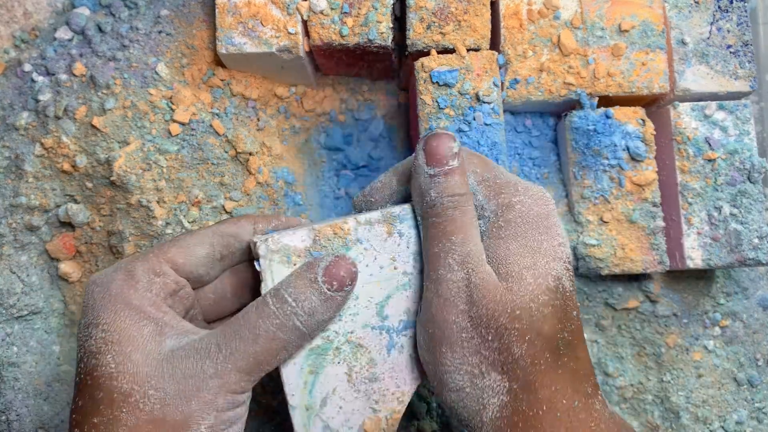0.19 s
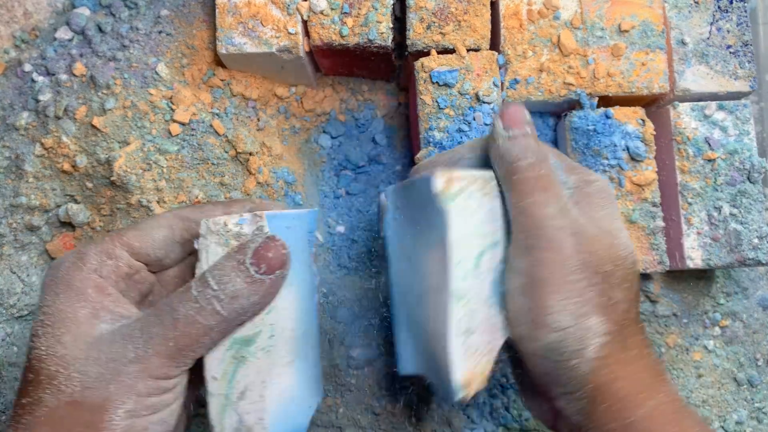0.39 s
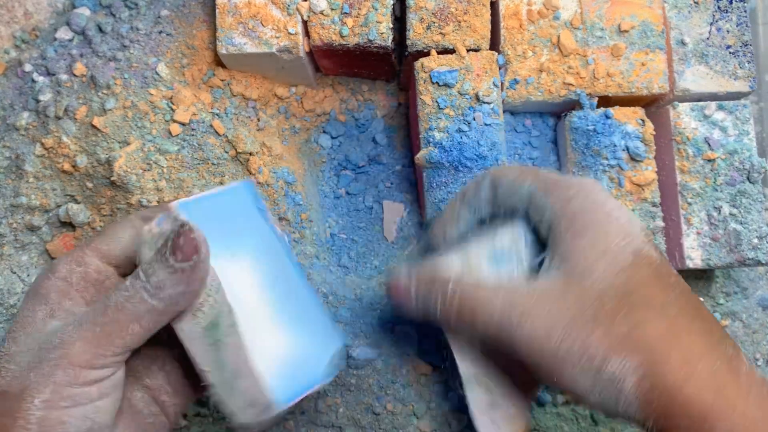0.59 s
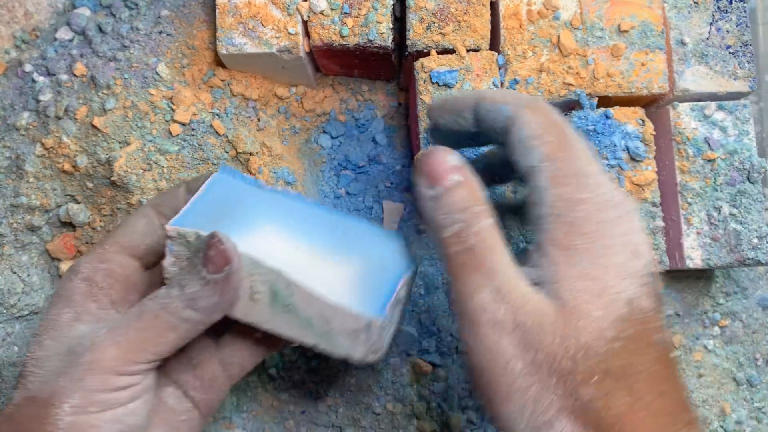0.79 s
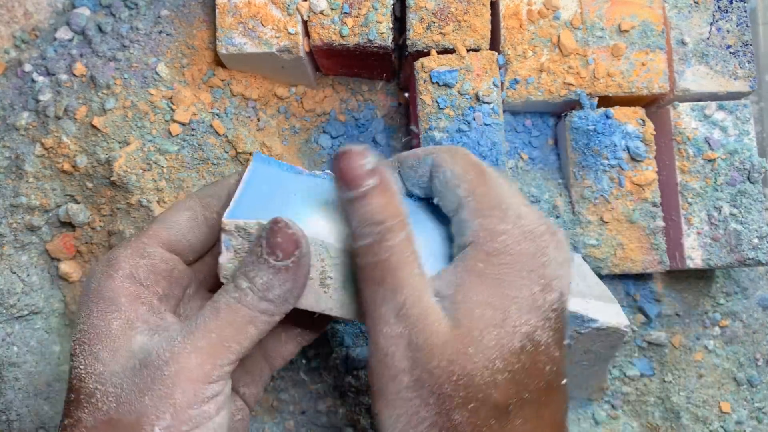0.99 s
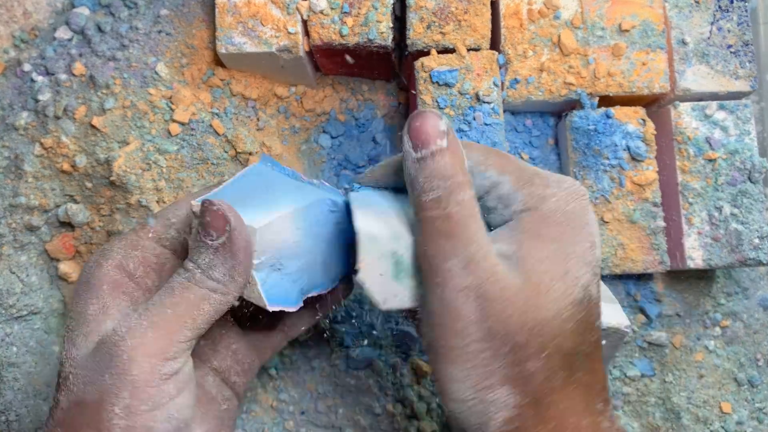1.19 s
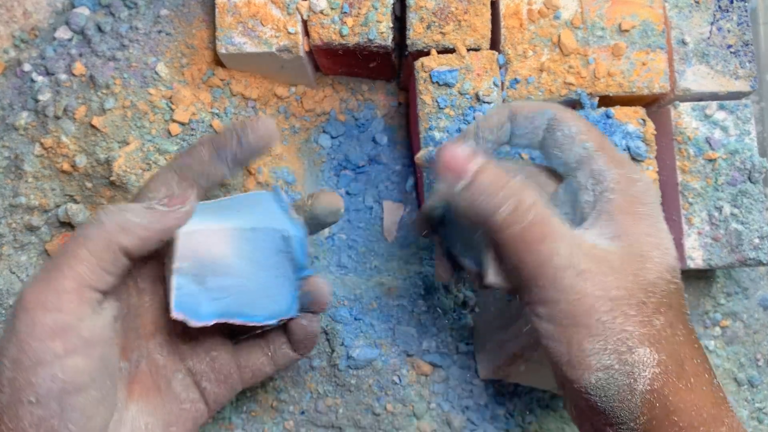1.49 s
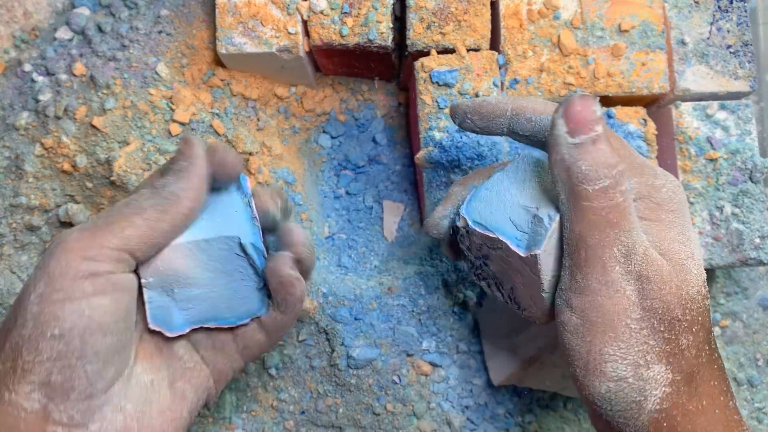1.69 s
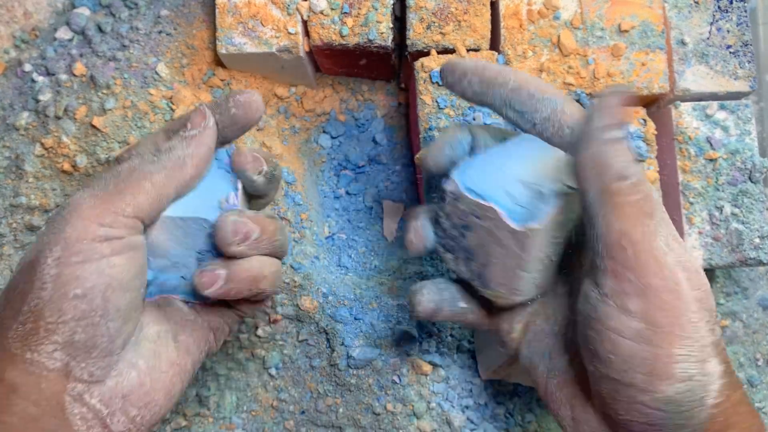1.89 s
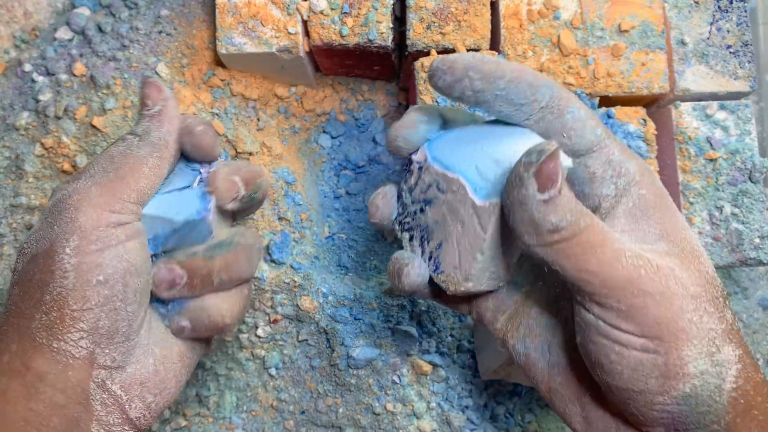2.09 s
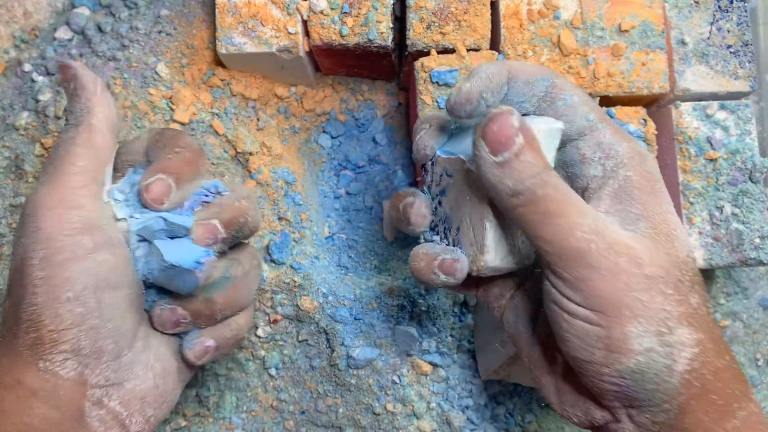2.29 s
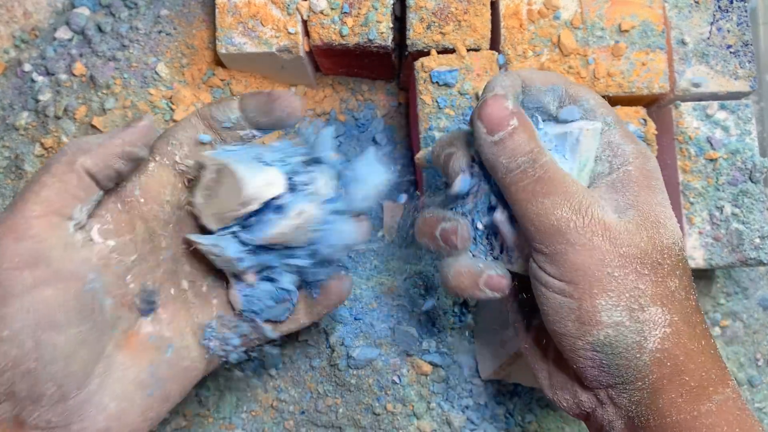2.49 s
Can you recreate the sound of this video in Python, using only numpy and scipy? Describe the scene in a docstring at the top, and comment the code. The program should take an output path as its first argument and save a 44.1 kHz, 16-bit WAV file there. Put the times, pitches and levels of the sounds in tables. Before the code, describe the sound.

Chalk breaks twice with a crisp crack and hollow thump, with faint gritty sliding between the breaks. Softer crunches follow as a fist crushes a piece, close to a stereo microphone in a small, quietly humming room.

```python
"""Over a low room hum, a block of gym chalk snaps in two hands. The pieces slide over each other,
snap again, and one is crushed in the fist. Each break is a burst of tiny fractures with a hollow
thump; rubbing is a stream of fine grit that makes a loose piece ring; crushing is a run of small
collapses over grinding powder. A close stereo microphone hears it in a small room."""
import sys
import numpy as np
from scipy import signal
from scipy.fft import rfft, irfft
from scipy.io import wavfile

SR = 44100
rng = np.random.default_rng(int(sys.argv[2]) if len(sys.argv) > 2 else 0)


def log_audio(samples):
    """Write samples as a 16-bit WAV file to the path given in sys.argv[1]."""
    # one column per channel
    frames = np.atleast_2d(samples).T
    # limit to full scale, then quantise
    limited = np.clip(frames, -1, 1)
    pcm = np.round(limited * 32767).astype(np.int16)
    wavfile.write(sys.argv[1], SR, pcm)


N = 116865
TIME = np.arange(N) / SR
LEFT_RIGHT = np.array([[1], [-1]])


def undb(db):
    """Decibels to gain."""
    return 10 ** (np.asarray(db) / 20)


def rms(x):
    """Root mean square, never zero."""
    return np.sqrt(np.mean(x ** 2) + 1e-30)


def unit(x):
    """Scale to rms 1."""
    return x / rms(x)


def fader(curve):
    """Gain along (t/s, level/dB) points."""
    return undb(np.interp(TIME, *np.array(curve).T))


def through(x, ir):
    """Both channels through one impulse response."""
    return signal.fftconvolve(x, ir[None], axes=1)[:, :x.shape[1]]


def add(out, x, at):
    """Mix x in, centred on the given time."""
    start = int(round(at * SR)) - x.shape[1] // 2
    lo, hi = max(start, 0), min(start + x.shape[1], N)
    out[:, lo:hi] += x[:, lo - start:hi - start]


def colour(x, spectrum, tilt_db_oct=0):
    """Unit-power filter through (f/Hz, level/dB) points, falling 14 dB/oct below them, then tilted."""
    size = 2048
    hz, db = np.array(spectrum).T
    octave = np.log2(np.maximum(np.fft.rfftfreq(size, 1 / SR), 10))
    below = np.maximum(np.log2(hz[0]) - octave, 0)
    shape_db = np.interp(octave, np.log2(hz), db) - 14 * below + tilt_db_oct * octave
    cepstrum = irfft(np.log(undb(shape_db - shape_db.max()) + 1e-5))
    cepstrum[1:size // 2] *= 2  # fold to minimum phase
    cepstrum[size // 2 + 1:] = 0
    ir = irfft(np.exp(rfft(cepstrum)))
    return through(x, ir / np.linalg.norm(ir))


def diffuse(spectrum, wide_hz=480):
    """Stereo noise through (f/Hz, level/dB) points, centred in the bass and wide above."""
    f = np.maximum(np.fft.rfftfreq(N, 1 / SR), 1)
    hz, db = np.array(spectrum).T
    mid, side = rfft(rng.standard_normal((2, N))) * undb(np.interp(np.log(f), np.log(hz), db))
    return unit(irfft(mid + LEFT_RIGHT * side * f / np.hypot(f, wide_hz), N))


def grains(size, per_s, spread_db, side_power=0.275):
    """Tiny fractures of random time and size, each leaning left or right; rms 1."""
    hit = rng.random(size) < per_s / SR
    strength = undb(spread_db * np.clip(rng.standard_normal(size), -2.5, 2.5))
    polarity, side = rng.choice([-1, 1], (2, size))
    lean = np.sqrt(1 - side_power) + np.sqrt(side_power) * LEFT_RIGHT * side
    return unit(hit * polarity * lean * strength)


def burst(spectrum, rise_s, decay_s, tilt_db_oct=0):
    """Fractures that build up and die away, peaking in the middle of the array."""
    t = np.arange(-4096, 4096) / SR
    envelope = np.exp(np.minimum(t / rise_s, -t / decay_s))
    fractures = envelope * grains(len(t), per_s=5500, spread_db=5)
    return unit(colour(fractures, spectrum, tilt_db_oct)) * rms(envelope)


# spectrum of the low room hum: f/Hz, level/dB
HUM_SPECTRUM = [(10, -55), (24, -28), (36, -4), (55, 5), (75, -0.5), (86, -1), (105, -0.5), (120, -1.5),
                (138, 8.5), (152, -3.5), (175, -14.5), (240, -21), (310, -10.5), (370, -18.5), (450, -16),
                (600, -29.5), (740, -33), (2000, -46), (6000, -47.5), (15000, -53.5)]
# spectrum of a hollow rush that swells after each break: f/Hz, level/dB
RUSH_SPECTRUM = [(10, -48), (150, -36.5), (300, -3), (420, 4), (570, 1.5), (700, -19), (1500, -28),
                 (5000, -69)]
# rush envelope: t/s, level/dB
RUSH_LEVEL = [(0, -60.5), (.2, -55.5), (.32, -52.5), (.5, -58), (.8, -68.5), (1.08, -79.5), (1.2, -62.5),
              (1.6, -70), (2.3, -73), (2.47, -57), (2.65, -62)]


def background(hum_db=-50, waver_db=0.5):
    """A slightly wavering low hum and a soft hollow rush that swells after each break."""
    waver = np.interp(TIME, np.arange(32) / 10, rng.standard_normal(32))
    hum = undb(hum_db + waver_db * waver) * diffuse(HUM_SPECTRUM)
    return hum + fader(RUSH_LEVEL) * diffuse(RUSH_SPECTRUM)


# powder envelope: t/s, level/dB
POWDER_LEVEL = [(0, -72.5), (.1, -93), (.42, -77), (.62, -74), (.69, -59), (.77, -88), (.88, -99),
                (.96, -70), (1.08, -66), (1.14, -57.5), (1.22, -68.5), (1.46, -71), (1.7, -66.5),
                (1.88, -63.5), (2.02, -57), (2.07, -62.5), (2.2, -59), (2.3, -66), (2.39, -60),
                (2.46, -64.5), (2.535, -69), (2.65, -57.5)]
# powder spectrum: f/Hz, level/dB
POWDER_SPECTRUM = [(350, -32), (600, -12.5), (809, -16), (1060, 1.5), (1230, -6), (2160, -1), (3160, -9.5),
                   (4310, 0.5), (4810, -14.5), (6760, -3.5), (8990, -13), (9760, -25), (10900, -5),
                   (12800, -17.5), (15500, -32)]


def powder():
    """Powder grinds and trickles between the fingers."""
    return fader(POWDER_LEVEL) * colour(grains(N, per_s=3000, spread_db=5), POWDER_SPECTRUM)


# finger strokes: t/s, length/s, level/dB, tilt/(dB/oct)
STROKES = [(0.082, 0.013, -71, -3), (0.394, 0.046, -69, 0.5), (0.48, .03, -62.5, 9), (.51, 0.18, -64, 2),
           (0.731, 0.013, -56.5, -1), (0.884, 0.014, -69.5, 3), (.928, 0.019, -56, 1), (.95, 0.051, -57, 0),
           (1.02, 0.03, -64, 4.5), (1.126, .05, -63, 3), (1.249, .018, -61, -2), (1.284, 0.014, -63, 6),
           (1.352, .022, -55.5, -1), (1.417, 0.013, -66, -2), (1.499, 0.029, -59, 0),
           (1.544, 0.024, -59, 2.5), (1.615, 0.017, -52, 4.5), (1.706, 0.046, -58.5, -0.5),
           (1.773, 0.037, -56, 3)]
# friction spectra: f/Hz, level/dB
GRIT_SPECTRUM = [(700, -24), (1400, -15), (2200, -12), (3000, -20.5), (4000, -4), (5000, -1), (6300, 0.5),
                 (7500, -5.5), (9000, -7.5), (11000, -7), (13000, -7.5), (14200, -12), (15500, -47)]
SCUFF_SPECTRUM = [(3500, -19), (5500, -19), (6150, 7), (6700, -14), (9000, -31), (12500, -12),
                  (15000, -36)]
GRIT_PER_S, GRIT_SPREAD_DB = 9900, 4


def rubs(attack_s=0.0069, release_s=0.0071, catch_db=3.5, catch_s=0.0062):
    """Skin catches and slips on the chalk, shedding fine grit; a piece scuffs once, high and narrow."""
    out, size = np.zeros((2, N)), 16384
    t = (np.arange(size) - size // 2) / SR
    for at, length, db, tilt in STROKES:
        edges = np.minimum((t + length / 2) / attack_s, (length / 2 - t) / release_s)
        envelope = np.exp(np.minimum(0, edges))
        catch = np.interp(t - t[0], catch_s * np.arange(128), rng.standard_normal(128))
        grit = colour(grains(size, GRIT_PER_S, GRIT_SPREAD_DB), GRIT_SPECTRUM, tilt)
        add(out, undb(db + catch_db * catch) * envelope * grit, at + length / 2)
    add(out, undb(-45.5) * burst(SCUFF_SPECTRUM, rise_s=0.0046, decay_s=0.014), at=0.932)
    return out


# modes of a loose piece: f/Hz, level/dB, t60/s
PIECE_MODES = [(2234, -11.5, 0.17), (4110, 4, 0.031), (4390, 9.5, 0.015), (5340, 0, 0.013),
               (6220, 7, 0.0087), (7630, 0.5, 0.014)]
# sliding drive: t/s, level/dB
SLIDE_LEVEL = [(.46, -71), (.482, -55.5), (.55, -67), (.62, -62.5), (.644, -50), (.67, -62.5), (.71, -78),
               (.75, -75)]


def loose_piece(clink_db=-26.5, tick_db=-35.5):
    """One piece scrapes along the other and clinks against its edge; both ring the same modes."""
    t = TIME[:SR // 3]
    ring = sum(undb(db - 60 * t / t60) * np.sin(2 * np.pi * hz * t) for hz, db, t60 in PIECE_MODES)
    tick = np.zeros((2, N))
    add(tick, burst(GRIT_SPECTRUM, rise_s=0.00042, decay_s=0.0013), at=0.6515)
    clink = unit(through(tick, ring)) * rms(tick)
    touching = (TIME > SLIDE_LEVEL[0][0]) & (TIME < SLIDE_LEVEL[-1][0])
    friction = touching * fader(SLIDE_LEVEL) * grains(N, GRIT_PER_S, GRIT_SPREAD_DB)
    scrape = through(friction, ring / np.linalg.norm(ring))
    return scrape + undb(clink_db) * clink + undb(tick_db) * tick


# small collapses: t/s, grit/dB, fragments/dB, thud/dB, rise/s, decay/s
COLLAPSES = [(0.181, -46, -84, -82, 0.00049, .0015), (.231, -66, -52, -72, 0.0015, 0.0033),
             (.853, -66, -88, -85, .002, .003), (0.2522, -44, -56, -34.5, 0.0015, 0.0077),
             (1.1, -55, -51, -55, 0.0019, .001), (1.110, -52, -56.5, -46, 0.0007, 0.0029),
             (1.772, -60, -50, -56, 0.0014, 0.0077), (1.846, -51.5, -52, -57, 0.00027, .002),
             (1.879, -42, -50.5, -64, 0.0004, 0.0013), (1.918, -42.5, -54.5, -49, 0.0029, 0.001),
             (1.93, -47, -65, -67, 0.00038, 0.0011), (1.943, -36, -27.5, -35, 0.0013, 0.0012),
             (2.001, -47, -46.5, -68, 0.0012, 0.0026), (2.006, -44.5, -42.5, -53, 0.00061, 0.0048),
             (2.058, -46.5, -51, -65, 0.00066, 0.0015), (2.094, -36.5, -48, -45.5, 0.00017, 0.006),
             (2.124, -42, -37, -50, 0.00062, 0.00068), (2.132, -37, -29, -39.5, 0.00023, 0.00086),
             (2.186, -41, -47.5, -65, 0.00029, 0.0039), (2.283, -45.5, -68, -70, .0005, 0.00072),
             (2.2968, -37, -43.5, -58, 0.00071, 0.0014), (2.320, -42, -64, -69, 0.00042, 0.0011),
             (2.328, -39.5, -60, -62, 0.00045, 0.0016), (2.334, -46.5, -54, -55, 0.0018, 0.007),
             (2.3538, -35.5, -42, -41, 0.002, 0.004), (2.359, -49, -56, -52, 0.00078, 0.02),
             (2.381, -41, -53, -46, 0.0048, 0.0037), (2.411, -47, -60, -62, .001, 0.0014),
             (2.434, -54, -54, -66, 0.00044, 0.0038), (2.551, -50, -54, -82, .002, 0.0059),
             (2.568, -60, -45.5, -46.5, 0.00055, 0.0025), (2.595, -63, -52, -54.5, 0.0015, .003),
             (2.632, -69, -34.5, -43, 0.0019, 0.0013)]
# spectra of fine grit, coarse fragments, cupped hand and cave-in: f/Hz, level/dB
FINE_SPECTRUM = [(900, -12), (2000, -5), (3000, -7.5), (4000, 0.5), (5000, -0.5), (6600, 4), (9000, -6),
                 (11000, -4.5), (13300, -0.5), (15500, -25.5)]
COARSE_SPECTRUM = [(600, -18), (1000, -9.5), (1350, -8.5), (1750, -2.5), (2200, -2), (2600, -2.5),
                   (3100, -13), (4300, -7), (5200, -12.5), (9000, -33), (15000, -41)]
THUD_SPECTRUM = [(100, -21), (220, -12), (320, 6), (500, -6), (800, -10), (1400, -17.5), (4000, -74)]
CAVE_IN_SPECTRUM = [(250, -9.5), (480, 0.5), (800, -6), (1300, -4), (1900, -13.5), (3500, -6.5),
                    (7000, -16), (15000, -43)]


def crunches():
    """Chalk gives way in grit and fragments, thudding in the fist; near the end the piece caves in."""
    out = np.zeros((2, N))
    for at, *levels_db, rise_s, decay_s in COLLAPSES:
        for db, spectrum in zip(levels_db, (FINE_SPECTRUM, COARSE_SPECTRUM, THUD_SPECTRUM)):
            add(out, undb(db) * burst(spectrum, rise_s, decay_s), at)
    add(out, undb(-41) * burst(CAVE_IN_SPECTRUM, rise_s=0.0037, decay_s=0.02), at=2.355)
    return out


# breaks: t/s, crack/dB, crack decay/s, crack tilt/(dB/oct), thump/dB, thump f/Hz
BREAKS = [(.2430, -18, 0.0011, 1.5, -16, 329), (1.0993, -18.5, 0.0011, -1.5, -22.5, 327)]
# crack spectra: f/Hz, level/dB
FIRST_CRACK = [(350, -12), (500, 10), (700, -0.5), (950, 5), (1250, -17), (1800, 0.5), (2300, 0),
               (3000, -3.5), (4100, -5), (5000, -10), (6500, -11), (8500, -19.5), (10500, -20),
               (13300, -18.5), (15500, -42)]
SECOND_CRACK = [(350, -11.5), (500, 4), (700, -8.5), (950, 2), (1250, -10.5), (1550, -0.5), (1850, -6),
                (2300, -4), (3000, -2.5), (4000, 3.5), (4900, -9.5), (6600, 2), (8500, -13), (11500, -4),
                (13500, -9), (15500, -34)]


def snaps(thump_lag_s=0.0001, knock_hz=511.4, recoil_hz=91.5):
    """A crack runs through the block; the halves thump, a higher mode knocks and the hands recoil."""
    out = np.zeros((2, N))
    for row, spectrum in zip(BREAKS, (FIRST_CRACK, SECOND_CRACK)):
        at, crack_db, decay_s, tilt, thump_db, thump_hz = row
        crack = burst(spectrum, rise_s=0.00045, decay_s=decay_s, tilt_db_oct=tilt)
        add(out, undb(crack_db) * crack, at)
        t = np.maximum(TIME - at - thump_lag_s, 0)
        onset = 1 - np.exp(-(t / 0.0024) ** 2)
        thump = np.sin(2 * np.pi * thump_hz * t) * onset * np.exp(-t / 0.0038)
        knock = np.sin(2 * np.pi * knock_hz * t) * onset * np.exp(-t / 0.0053)
        recoil = np.sin(2 * np.pi * recoil_hz * t) * (1 - np.exp(-t / 0.008)) * np.exp(-t / 0.032)
        out += 2 * undb(thump_db) * (thump + undb(-12.5) * knock + undb(-23) * recoil)
    return out


def room(x, right_lag_s=0.00008, scatter_decay_s=0.0034, t60_s=0.22, low_t60_s=0.31):
    """Direct sound, later on the right; scatter off hands and chalk; a short tail with longer lows."""
    t = TIME[:SR // 2]
    low_pass = signal.butter(2, 700, fs=SR, output="sos")
    high_pass = signal.butter(2, 1200, "high", fs=SR, output="sos")
    onset = 1 - np.exp(-(t / 0.002) ** 2)
    envelopes = np.array([np.exp(-t / scatter_decay_s),
                          onset * undb(-60 * t / t60_s),
                          onset * undb(-60 * t / low_t60_s)])
    out = []
    for channel, lag_s in zip(x, (0, right_lag_s)):
        decays = envelopes * rng.standard_normal((3, len(t)))
        scatter, tail, low_tail = decays / np.linalg.norm(decays, axis=1, keepdims=True)
        ir = undb(-4.5) * signal.sosfilt(high_pass, scatter) + undb(-12.5) * tail
        ir += undb(-13) * signal.sosfilt(low_pass, low_tail)
        delay = np.exp(-2j * np.pi * np.fft.rfftfreq(N, 1 / SR) * lag_s)
        direct = irfft(rfft(channel) * delay, N)
        out.append(direct + signal.fftconvolve(channel, ir)[:N])
    return np.array(out)


def scene(chalk_pan_db=-1, background_pan_db=-1.5):
    """The chalk in the room over the hum, both slightly to the right."""
    chalk = room(snaps() + powder() + crunches() + rubs() + loose_piece())
    sides = LEFT_RIGHT / 2
    return chalk * undb(chalk_pan_db * sides) + background() * undb(background_pan_db * sides)


def record(dry, notch_hz=9750, top_hz=15800):
    """The microphone has a notch in the treble; the top is cut steeply."""
    notched = signal.lfilter(*signal.iirnotch(notch_hz, Q=5, fs=SR), dry)
    return signal.sosfilt(signal.ellip(8, 0.2, 70, top_hz, fs=SR, output="sos"), notched)


dry = scene()
out = record(dry)
log_audio(out)
```